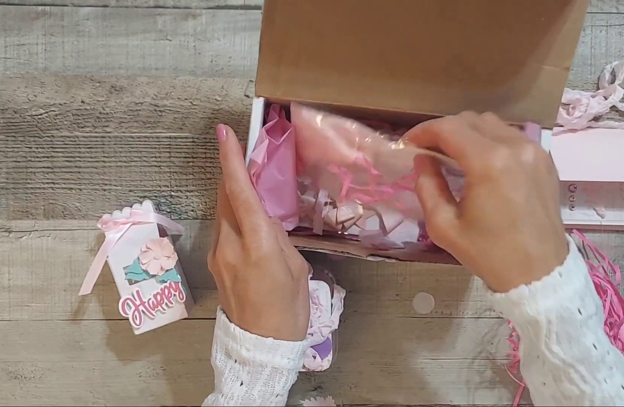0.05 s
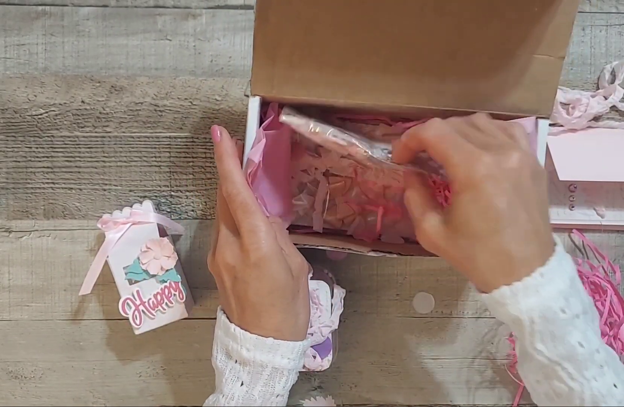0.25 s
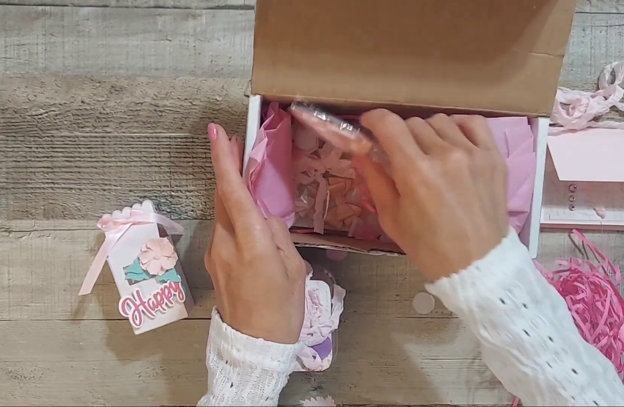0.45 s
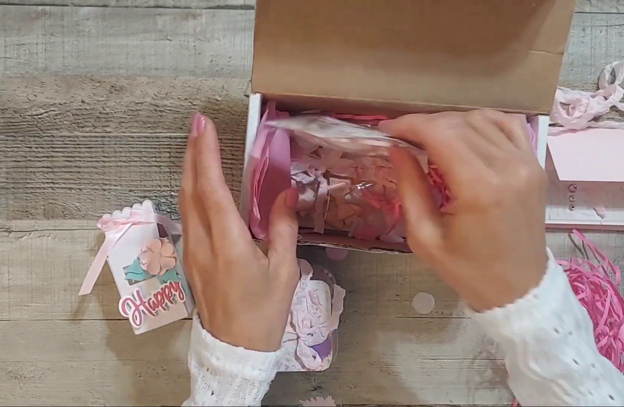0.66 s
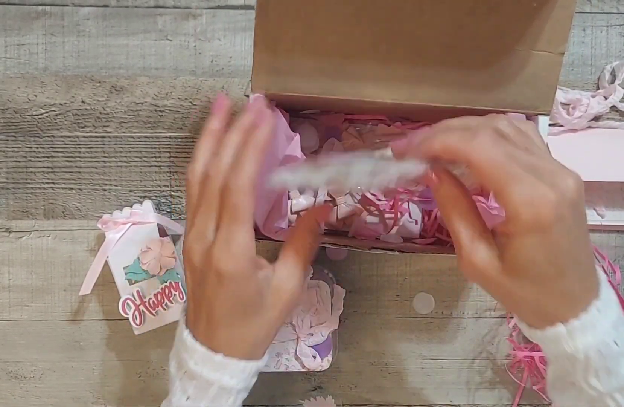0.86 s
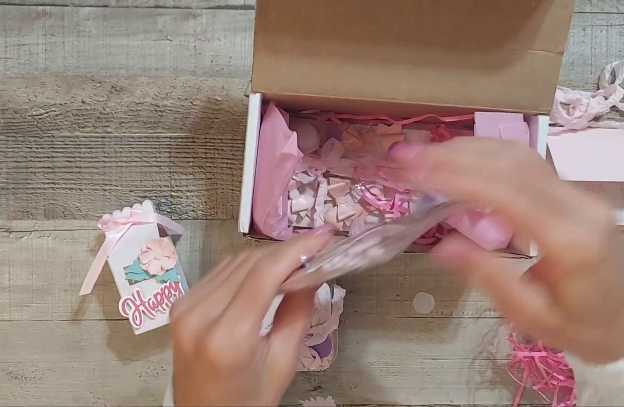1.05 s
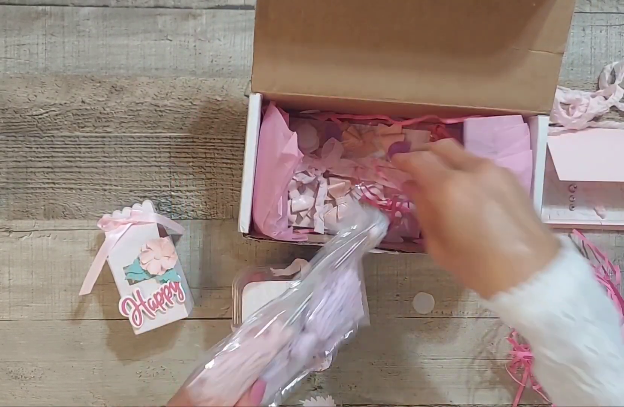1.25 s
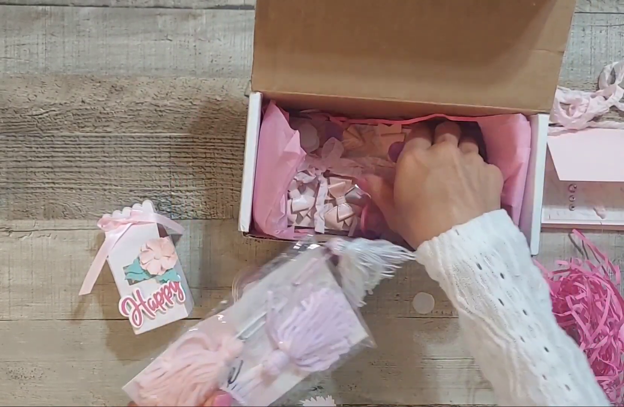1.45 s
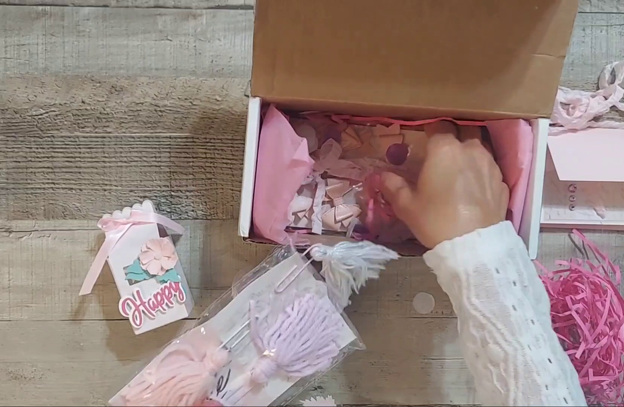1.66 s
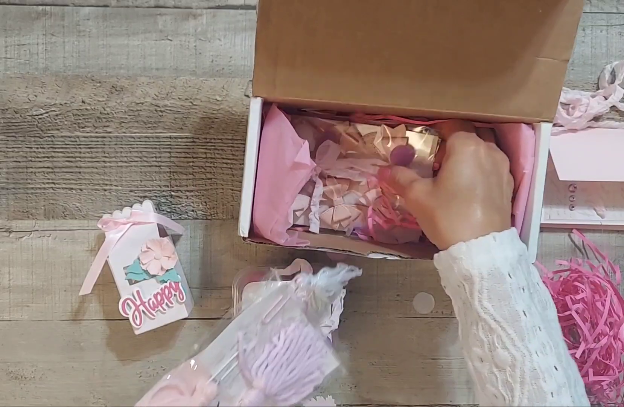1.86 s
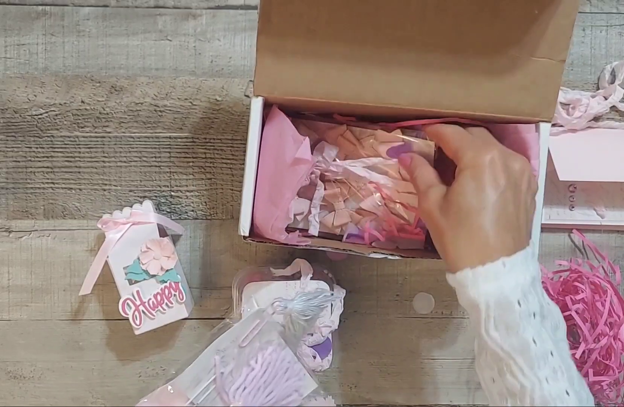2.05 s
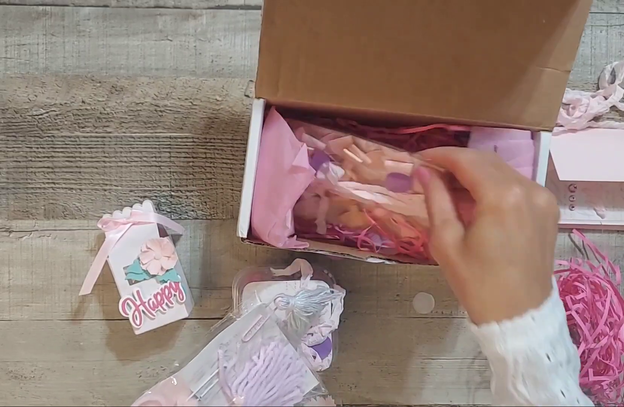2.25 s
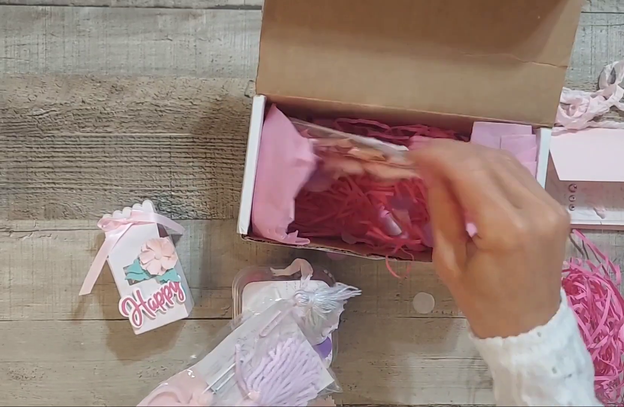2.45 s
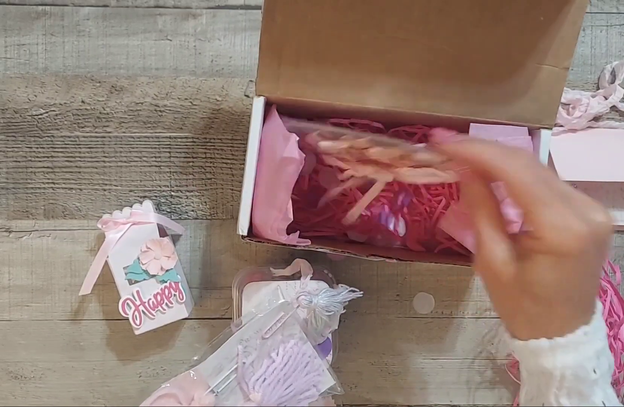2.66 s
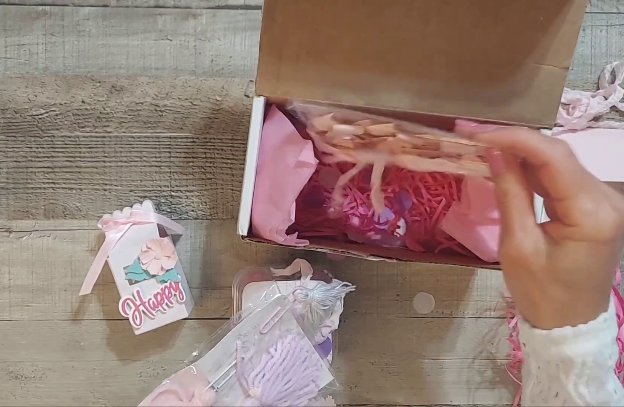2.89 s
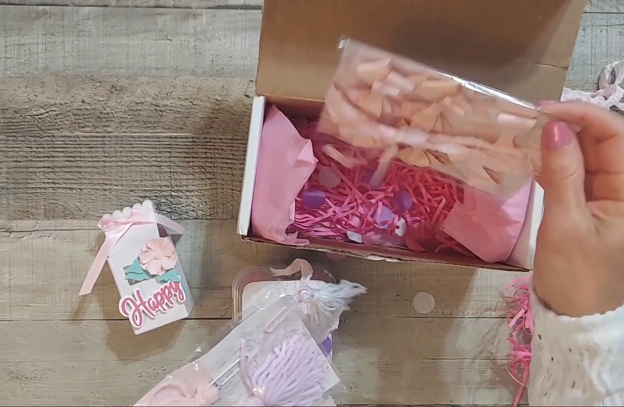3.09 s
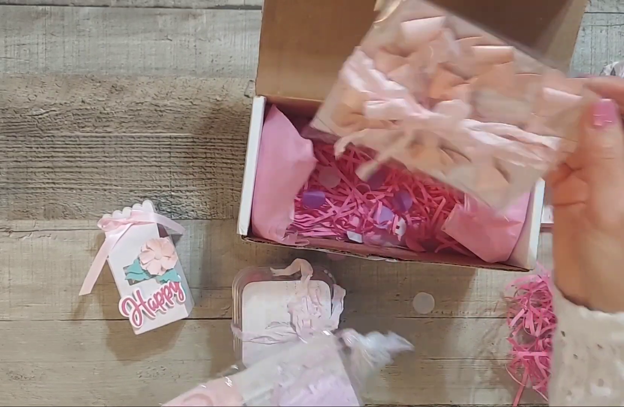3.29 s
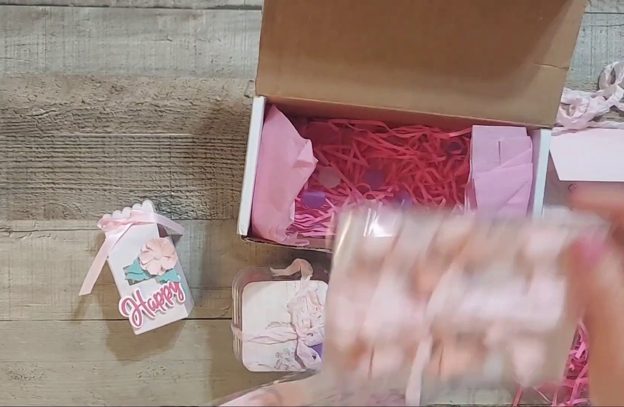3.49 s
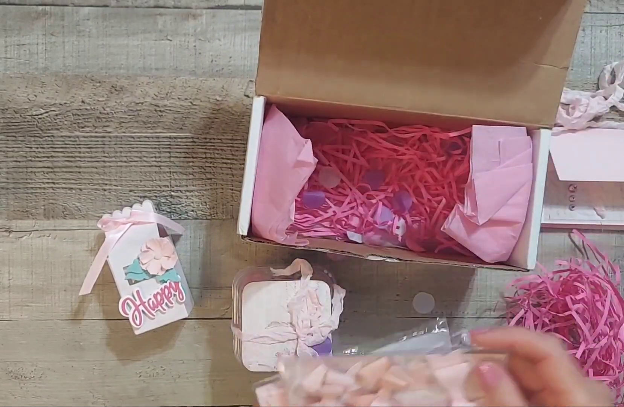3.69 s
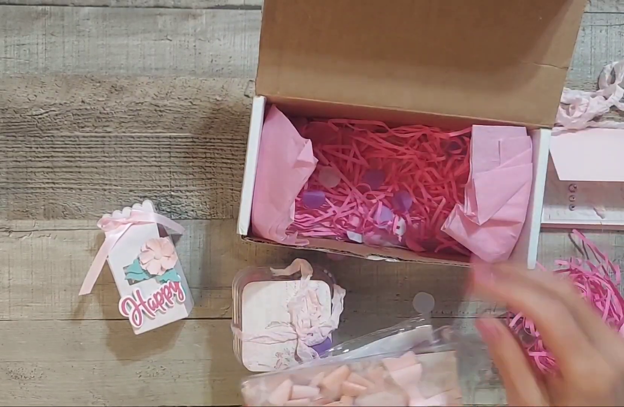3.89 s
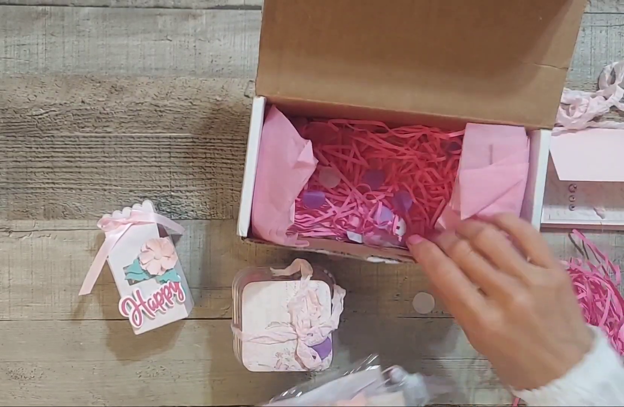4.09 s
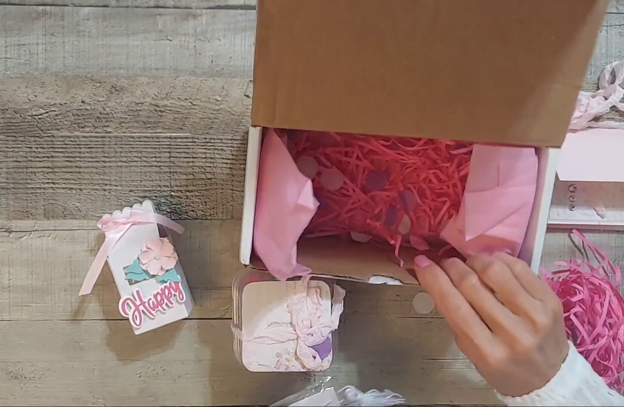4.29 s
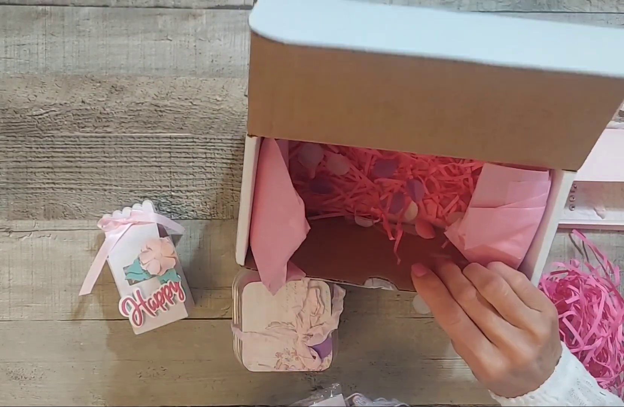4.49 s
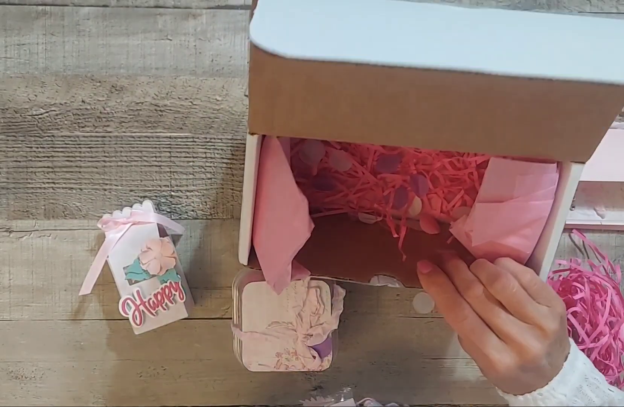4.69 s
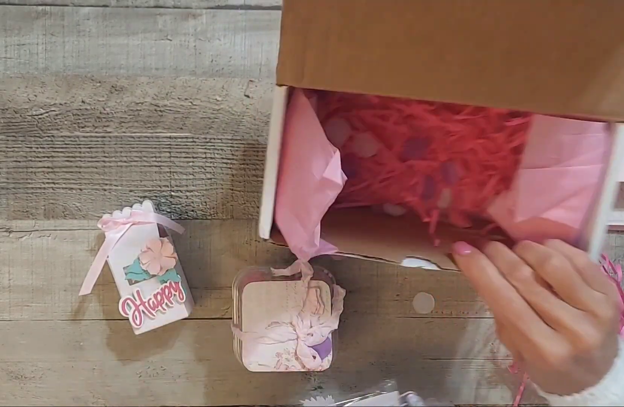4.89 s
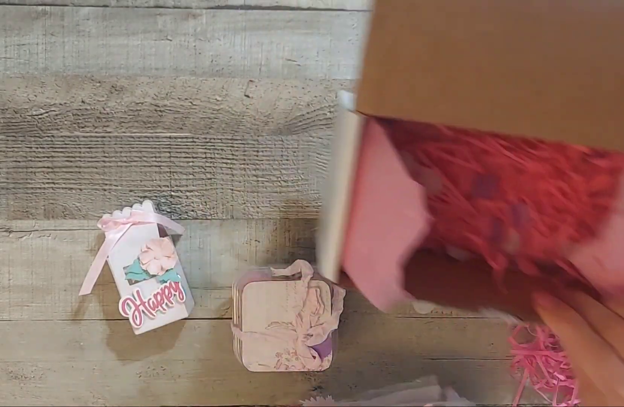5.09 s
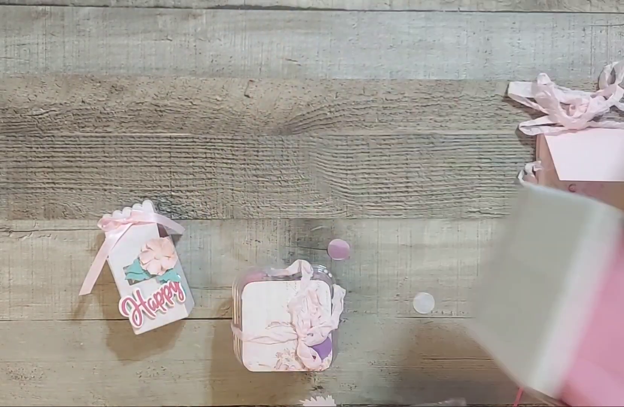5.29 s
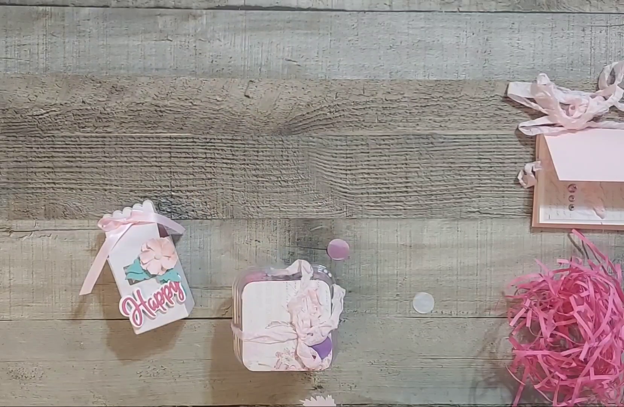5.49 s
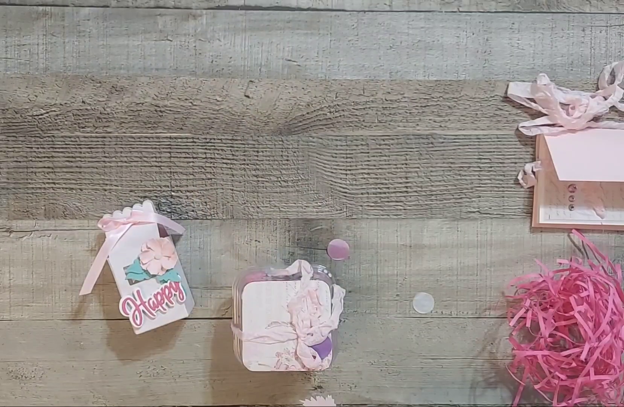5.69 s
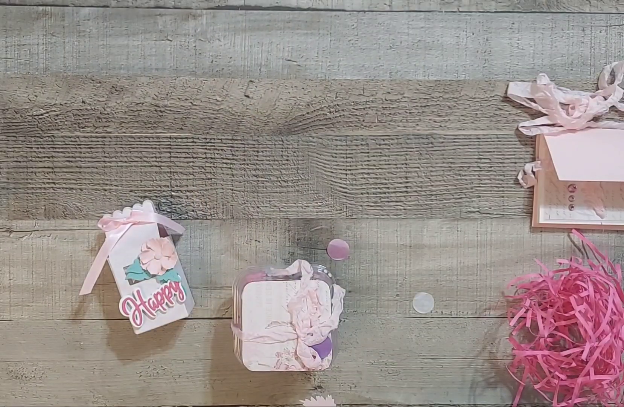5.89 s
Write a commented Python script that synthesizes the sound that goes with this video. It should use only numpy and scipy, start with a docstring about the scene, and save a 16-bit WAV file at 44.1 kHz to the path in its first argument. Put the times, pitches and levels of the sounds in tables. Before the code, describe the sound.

Hands pull two crinkly film packets from a box of dry paper strips: bright irregular snaps, dense rustle and low cardboard rubbing. A soft double knock comes at 1.5 seconds, the strongest crackles around 2 to 2.5 and 3.9. Light bumps and scrapes end in quiet, recorded close with a short room response.

```python
"""Cellophane packets lifted from a box

Hands lift two film packets out of a cardboard box lined with tissue and paper shred, then slide the box away.
Film: shaped noise snaps, random small cracks and clumped resonant slips. Shred and cardboard: lower slips.
Drags are narrow-band noise; knocks ring damped box modes. A small room answers as decaying stereo noise.
Coloured noise makes the still air, wavering sines the low hum."""
import sys
import numpy as np
from scipy import signal
from scipy.fft import rfft, irfft, next_fast_len
from scipy.io import wavfile

SR = 44100
rng = np.random.default_rng(int(sys.argv[2]) if len(sys.argv) > 2 else 0)


def to_wav(sig):
    """Store sig (one row per channel, or 1-D mono) as 16-bit WAV at the path in sys.argv[1].

    Samples outside -1..1 are clipped; the rate is SR.
    """
    pcm = np.clip(np.atleast_2d(sig), -1, 1) * 32767
    pcm = np.round(pcm).astype(np.int16)
    wavfile.write(sys.argv[1], SR, pcm.T)  # frames by channels


N = 262174
TIME_S = np.arange(N) / SR

# Spectrum of the still air. Each row: frequency in Hz, relative density in dB per Hz.
AIR_SPECTRUM = [(15, -41), (25, -31.5), (50, -13.5), (62, -6.5), (125, -5), (160, -9), (212, -10),
                (310, -15), (440, -20.5), (820, -25.5), (1260, -30.5), (2160, -31), (2800, -36),
                (6000, -41.5), (10000, -43), (13000, -39), (16000, -42.5)]
AIR_RMS_DB = -69.5
# Hum tones. Each row: frequency in Hz, rms level in dB before wavering and stereo lean.
HUM_TONES = [(69, -94), (98.5, -83), (154.4, -78)]

# Hand grips, pulls or sets down a packet. Each row: start in seconds, length in seconds,
# relative shred rustle in dB, film crinkle against that rustle in dB.
STROKES = [(-0.01, 0.1, -48, -3), (0.112, 0.063, -51.5, -3), (0.231, 0.12, -70.5, -2),
           (0.328, 0.069, -53.5, 0), (0.431, 0.02, -58, -4), (0.567, 0.032, -57.5, -7),
           (0.614, 0.1, -54, -5), (0.733, 0.043, -58, 1.5), (0.841, 0.018, -55, 1), (1.06, .03, -71.5, 4),
           (1.086, 0.057, -47.5, -5.5), (1.19, .055, -66, -2), (1.296, 0.079, -81, 4),
           (1.403, 0.046, -63, -5), (1.473, 0.08, -56, -5.5), (1.636, 0.074, -57.5, -10.5),
           (1.762, 0.15, -59, -9.5), (1.879, 0.082, -47, -3.5), (1.971, 0.061, -50, -6),
           (2.014, 0.072, -44.5, -1.5), (2.104, 0.18, -50, -11), (2.276, 0.089, -46.5, -1),
           (2.387, 0.056, -49, -4), (2.484, 0.24, -58.5, -2.5), (2.733, 0.029, -52.5, 1),
           (2.842, 0.1, -60.5, -10), (2.988, 0.037, -76.5, 8), (3.147, .07, -73, 4),
           (3.228, 0.042, -69.5, 10.5), (3.417, 0.021, -62, 2), (3.601, 0.054, -74.5, 4),
           (3.665, 0.018, -58.5, -3), (3.78, .06, -64.5, -0.5), (3.871, 0.08, -54.5, -0.5),
           (3.924, 0.035, -64, 1), (4.159, 0.13, -65.5, -1), (4.362, 0.05, -59.5, -5),
           (4.939, 0.036, -71, -6), (5.048, 0.16, -75.5, -2), (5.186, 0.024, -62, -7.5)]
ATTACK_S, RELEASE_DB_PER_S = .009, 379
# Held film and shred stir faintly between strokes, until the hand lets go.
STIR_SHRED_DB, STIR_FILM_DB, STIR_LENGTH_S = -80.5, -78, 4.3
# Contents pressing on the cardboard. Each row: time in seconds, rubbing against the rustle in dB.
CONTACT = [(0.0, -3.5), (0.7, -1), (0.8, -11.5), (1.12, -10), (1.42, -8), (1.7, -5), (2.05, -3), (2.2, 0),
           (2.35, -4.5), (2.55, 0.5), (2.7, -15), (4.0, -21.5)]
# Box pushed over the table. Each row: start in seconds, length in seconds, relative level in dB.
PUSHES = [(1.51, 0.09, -54), (4.18, .15, -62), (4.41, 0.086, -62), (5.06, 0.046, -76), (5.199, 0.013, -61),
          (5.69, 0.041, -77)]

# Spectra of the materials. Each row: frequency in Hz, relative density in dB per Hz.
SHRED_SPECTRUM = [(300, -24.5), (700, -13), (1250, -2), (1800, 1.5), (2500, 2), (3050, 6.5), (3800, -2.5),
                  (4600, 7.5), (6000, -11), (8000, -9.5), (10000, 0.5), (16000, -11)]
CRINKLE_SPECTRUM = [(1000, -33), (3000, -7.5), (6000, 3.5), (8000, 6.5), (9700, -6), (12500, 5),
                    (20000, -6.5)]
CARDBOARD_SPECTRUM = [(80, -10.5), (200, -12.5), (300, -12), (400, -9), (520, -11.5), (670, -1), (760, -6),
                      (880, -5), (1250, -8), (1800, -12.5), (3000, -25)]
FILM_SPECTRUM = [(150, -20.5), (450, -15.5), (900, -13), (1350, -3), (2100, 2.5), (3000, 1), (3900, -4.5),
                 (4800, -1), (6000, -8), (8000, -1.5), (9700, -5.5), (12500, 1.5), (20000, -19.5)]
MAX_SLIP_STEPS = 4.5   # largest slip, in mean steps
SLIDING_HISS_RMS = .3   # smooth sliding against the separate slips

# Film buckles. Each row: start in seconds, relative level in dB, pitch of the buckling facet in Hz,
# treble against the middle band in dB.
SNAPS = [(0.0097, -34, 5600, 1.5), (0.1181, -29, 2750, -7), (0.1431, -33.5, 4580, 6.5),
         (0.1474, -31, 2930, -5), (0.186, -37.5, 4540, 4), (0.2445, -42.5, 2830, 0), (0.3207, -42, 1480, 0),
         (0.3467, -39.5, 5900, 6.5), (0.44, -38.5, 5140, -0.5), (0.5787, -49, 3500, 8.5),
         (0.586, -39, 3240, -3), (0.6232, -31, 2440, 3.5), (0.7148, -43, 1850, -4), (0.7545, -37, 2320, -7),
         (0.8244, -40.5, 3070, 6), (0.858, -41, 3140, -11), (0.8637, -38, 1410, -2.5),
         (1.0924, -42.5, 1520, -1), (1.107, -29.5, 2730, -7), (1.1156, -31.5, 2400, 3.5),
         (1.131, -25.5, 2670, -14), (1.1447, -31.5, 2240, 4), (1.1771, -30, 4930, -7),
         (1.207, -38, 1510, -4), (1.2546, -41.5, 1460, -18), (1.2934, -41.5, 3080, -1.5),
         (1.3963, -41.5, 2670, 0.5), (1.422, -50.5, 2500, 10), (1.61, -44, 4260, -3.5),
         (1.731, -55.5, 2950, 8), (1.8123, -40, 5300, 5), (1.823, -40.5, 1890, 3.5), (1.8663, -38, 1270, 3),
         (1.904, -42, 1300, -6), (1.914, -38, 1260, -5), (1.9233, -28.5, 3050, -7),
         (1.938, -35.5, 4610, 3.5), (2.036, -32.5, 4020, -2), (2.06, -27.5, 3070, -3),
         (2.0808, -24, 2870, -14), (2.2139, -38, 4240, 4), (2.2192, -47, 1440, 9), (2.2525, -38, 1250, -1),
         (2.3653, -22.5, 3200, -17), (2.3956, -32.5, 3190, -9), (2.403, -30, 5930, -3),
         (2.4164, -25, 3000, -8), (2.458, -30, 3320, -1.5), (2.529, -48, 2200, -17),
         (2.7456, -34, 2340, -2.5), (2.805, -45, 3530, -11), (2.8544, -31, 3120, -4),
         (2.9422, -42.5, 1770, -4.5), (3.0569, -42, 2800, -13), (3.151, -56.5, 6400, 5.5),
         (3.188, -50.5, 6400, -1), (3.242, -48, 2880, -14), (3.309, -47.5, 2800, -3),
         (3.423, -42.5, 3730, -5), (3.492, -46, 4900, 9.5), (3.5863, -42, 2140, -0.5),
         (3.6738, -39.5, 2310, -0.5), (3.774, -50.5, 3730, 6.5), (3.8033, -47.5, 2080, -1),
         (3.8326, -42, 2900, -13), (3.8542, -42, 1760, 3.5), (3.864, -36, 2540, -1.5),
         (3.8929, -31, 3630, -0.5), (3.9019, -23.5, 2600, -5), (3.9052, -30, 2350, -4),
         (3.9104, -29, 1990, -6), (3.9442, -33.5, 4830, -4), (4.002, -42.5, 2600, 2.5),
         (4.036, -38, 2770, -20), (4.057, -31.5, 3020, -10), (4.0673, -40.5, 1720, 1.5),
         (4.19, -36.5, 2840, -12.5), (4.269, -61.5, 4630, 14.5), (4.3562, -44, 4060, -12),
         (4.3806, -30, 2600, -6.5), (4.806, -66.5, 2400, -14), (4.927, -37.5, 3060, -20.5),
         (5.0583, -56.5, 2000, -16), (5.1186, -51.5, 1600, -3), (5.1388, -53.5, 6090, 7),
         (5.1995, -31, 2870, -5.5), (5.2149, -30, 3100, -5.5), (5.2834, -37, 3140, -5.5)]
CRACK_DECAY_S = .00036
# A larger, lower facet moves more air: body against the middle band.
SNAP_BODY_DB, SNAP_BODY_DB_PER_OCTAVE = -6.5, -5.5
AVERAGE_FACET_HZ = 3000
FACET_RING_DB_PER_DB = 0.906   # a dull buckle rings its facet more: ring gained per treble lost

# Surface drags on one resonance. Each row: peak time in seconds, time from peak to 1/e amplitude in seconds,
# rms level at the peak in dB, pitch in Hz.
DRAGS = [(0.042, 0.085, -56, 785), (2.15, 0.024, -57.5, 1258), (2.277, 0.017, -51, 1510),
         (2.356, 0.0079, -41, 1246), (2.455, 0.0055, -45, 3100), (2.65, 0.012, -56, 3300),
         (2.88, 0.017, -55.5, 3100), (3.272, 0.03, -65.5, 2960), (4.193, 0.021, -61, 657),
         (4.497, 0.0094, -57, 631), (4.546, 0.01, -71, 707), (4.959, 0.022, -70.5, 3820)]
# Knocks on the box. Each row: start in seconds, relative level in dB, hardness of the contact as a cutoff in Hz.
BUMPS = [(1.516, -39, 2500), (1.5272, -42.5, 700), (1.535, -38.5, 342), (1.555, -53, 450),
         (0.144, -45.5, 900), (4.2274, -51.5, 1180), (4.237, -53, 101.7), (4.321, -48, 300),
         (4.3827, -48, 3500), (4.482, -60, 800)]
# Damped modes of the cardboard box. Each row: frequency in Hz, level in dB before random scatter, t60 in seconds.
BOX_MODES = [(127, -10, .07), (163, -12, .08), (232, -3.5, .08), (335, -9, .08), (398, -3, .07),
             (520, 0, .06), (602, .5, .07), (700, 4, .02), (776, -.5, .07), (1270, 4, .035),
             (1475, 4.5, .03), (2000, 8, .025)]

# Correlation of the two channels. Each row: frequency in Hz, correlation from -1 to 1.
NEAR_LIKENESS = [(100, .94), (1000, 0.98), (3000, 0.72), (5000, 0.11), (8000, 0.089), (12000, 0.04)]
ROOM_LIKENESS = [(25, 0.41), (100, 0.97), (500, 0.1), (1500, 0), (4000, 0.072), (12000, 0)]
# Room decay. Each row: frequency in Hz, t60 in seconds.
ROOM_T60 = [(200, 0.28), (1000, 0.24), (4000, 0.245), (8000, 0.22), (15000, 0.2)]
CUTOFF_HZ = 16100


def from_db(db):
    """Decibels to gain."""
    return 10 ** (np.asarray(db) / 20)


def rms_one(x):
    """Scale to an rms of 1."""
    return x / np.sqrt(np.mean(x ** 2) + 1e-20)


def unit_energy(x):
    """Scale each channel to an energy of 1."""
    return x / np.linalg.norm(x, axis=-1, keepdims=True)


def lean(x, db):
    """Raise left over right by db; a negative value favours the right."""
    return x * from_db(db * np.array([[.5], [-.5]]))


def at_hz(points, hz):
    """Interpolate a table on a log-frequency axis."""
    freq_hz, value = np.transpose(points)
    return np.interp(np.log(hz + 1), np.log(freq_hz), value)


def drift(rate_hz):
    """Slow chance: lines between normal draws of spread 1, rate_hz draws a second."""
    knots = rng.standard_normal(N // 20)
    return np.interp(TIME_S * rate_hz, np.arange(len(knots)), knots)


def convolve(x, response):
    """Filter by an impulse response, keeping the length."""
    return signal.fftconvolve(x, np.atleast_2d(response), axes=-1)[:, :x.shape[-1]]


def colour(x, spectrum, size=4096):
    """Causal minimum-phase filter of the given spectrum, power gain 1 for white noise."""
    gain = from_db(at_hz(spectrum, np.fft.rfftfreq(size, 1 / SR)))
    cepstrum = irfft(np.log(gain))
    # fold the cepstrum onto positive time: minimum phase
    cepstrum[1:size // 2] *= 2
    cepstrum[size // 2 + 1:] = 0
    response = irfft(np.exp(rfft(cepstrum)))
    return convolve(x, response / np.linalg.norm(response))


def stereo(pair, likeness):
    """Mix two unrelated signals into left and right with the given correlation at each frequency."""
    size = next_fast_len(pair.shape[-1])
    mid, side = rfft(pair, size)
    alike = np.clip(at_hz(likeness, np.fft.rfftfreq(size, 1 / SR)), -1, 1)
    shared = np.sqrt((1 + alike) / 2) * mid
    opposed = np.sqrt((1 - alike) / 2) * side * [[1], [-1]]
    return irfft(shared + opposed, size)[:, :pair.shape[-1]]


def cut(x, hz, kind, order=2):
    """Butterworth filter, edges kept in a safe range."""
    edges_hz = np.clip(hz, 10, .45 * SR)
    return signal.sosfilt(signal.butter(order, edges_hz, kind, fs=SR, output="sos"), x)


def resonate(x, hz, width_hz):
    """Two-pole resonance with a peak gain of 1."""
    r = np.exp(-np.pi * width_hz / SR)
    numerator = np.array([1, 0, -1]) * (1 - r * r) / 2
    denominator = [1, -2 * r * np.cos(2 * np.pi * hz / SR), r * r]
    return signal.lfilter(numerator, denominator, x)


def background(waver=0.37, hum_lean_db=-3):
    """Still air as coloured diffuse noise; hum as sines wavering in amplitude and phase."""
    noise = stereo(rng.standard_normal((2, N)), ROOM_LIKENESS)
    air = from_db(AIR_RMS_DB) * colour(noise, AIR_SPECTRUM, size=16384)
    hum = 0
    for hz, db in HUM_TONES:
        amplitude = from_db(db) * np.sqrt(2) * (1 + waver * drift(21))
        hum = hum + amplitude * np.sin(2 * np.pi * hz * TIME_S + drift(5))
    return air + lean(hum, hum_lean_db)


def stroke(start_s, length_s):
    """Amplitude of one movement: quick swell, hold, even decay in dB."""
    age_s = np.maximum(TIME_S - start_s, 0)
    swell = 1 - np.exp(-(age_s / ATTACK_S) ** 2)
    return swell * from_db(-RELEASE_DB_PER_S * np.maximum(age_s - length_s, 0))


def effort(movements):
    """Level in dB of overlapping movements (start s, length s, dB), summed in power."""
    power = sum((from_db(db) * stroke(start_s, length_s)) ** 2 for start_s, length_s, db in movements)
    return 10 * np.log10(power + 1e-12)


def hands():
    """Hand movements drive the levels in dB of cardboard rub, shred rustle and film crinkle."""
    shred_moves = [(start_s, length_s, db) for start_s, length_s, db, _ in STROKES]
    film_moves = [(start_s, length_s, db + film_db) for start_s, length_s, db, film_db in STROKES]
    shred_db = effort(shred_moves + [(0.014, STIR_LENGTH_S, STIR_SHRED_DB)])
    film_db = effort(film_moves + [(0.11, STIR_LENGTH_S, STIR_FILM_DB)])
    inside_db = shred_db + np.interp(TIME_S, *np.transpose(CONTACT))
    rub_db = 20 * np.log10(np.hypot(from_db(inside_db), from_db(effort(PUSHES))))
    return rub_db, shred_db, film_db


def creases(per_s, spread_db, low_hz, high_hz, cycles, hiss, clump_db, shift_db, count=16):
    """Tiny slips in clumps each ring one facet for a few cycles, over the hiss of sliding."""
    born = rng.random(N) < per_s * from_db(clump_db * drift(60)) / SR
    sizes = born * from_db(spread_db * np.minimum(rng.exponential(1, N), MAX_SLIP_STEPS))
    clicks = sizes * rng.choice([-1, 1], (2, N))
    facet = rng.integers(0, count, N)
    rings = 0
    for k, hz in enumerate(np.geomspace(low_hz, high_hz, count)):
        load = from_db(shift_db * drift(45))   # strain on each facet wanders
        struck = clicks * (facet == k) * load + 1e-18
        rings = rings + resonate(struck, hz, hz / cycles) / np.sqrt(hz)
    sliding = hiss * rng.standard_normal((2, N))
    return stereo(rms_one(rms_one(rings) + sliding), NEAR_LIKENESS)


def folds(shred_db, level_db=-6):
    """Stiff strips of shred kink with pitched ticks: sparse slips on longer-ringing facets."""
    ticks = creases(per_s=130, spread_db=2, low_hz=1100, high_hz=5200, cycles=7, hiss=0,
                    clump_db=3, shift_db=1.5)
    return lean(from_db(shred_db + level_db) * ticks, db=1.4)


def crackle(film_db, per_s=110, spread_db=2, level_db=-2):
    """Lesser film buckles: decaying noise bursts at random, as strong as the stroke that bends it."""
    born = rng.random(N) < per_s / SR
    clicks = born * from_db(spread_db * np.minimum(rng.exponential(1, N), MAX_SLIP_STEPS))
    bursts = signal.lfilter([1], [1, -np.exp(-1 / (CRACK_DECAY_S * SR))], clicks + 1e-18)
    noise = stereo(bursts * rng.standard_normal((2, N)), NEAR_LIKENESS)
    cracks = colour(noise, FILM_SPECTRUM)
    return lean(from_db(film_db + level_db) * rms_one(cracks), db=-5.0)


def snaps(flutter_s=0.015, flutter_db=-22, rebound_s=0.0015, rebound_db=-7, facet_db=1, facet_q=7,
          body_hz=1900, treble_hz=6200, level_db=15.0, lean_db=1.5, treble_s=0.0043, size=1024):
    """A buckle cracks, rings its facet, rebounds and flutters; returns near sound and mono room pulses."""
    out = np.zeros((3, N + size))
    t = np.arange(size) / SR
    rebound = from_db(rebound_db) * np.exp(-np.abs(t - rebound_s) / CRACK_DECAY_S)
    flutter = from_db(flutter_db) * np.exp(-t / flutter_s)
    shape = np.exp(-t / CRACK_DECAY_S) + rebound + flutter
    grains = rng.standard_normal((len(SNAPS), 2, size))
    for (start_s, db, hz, high_db), grain in zip(SNAPS, grains):
        near = stereo(grain, NEAR_LIKENESS) * shape
        ring_db = facet_db - FACET_RING_DB_PER_DB * high_db
        near = near + from_db(ring_db) * resonate(near, hz, hz / facet_q)
        # third channel: the plain pulse the whole sheet sends into the room
        crack = colour(np.vstack([near, t == 0]), FILM_SPECTRUM, size=512)
        # slack folds have more body, tight creases more treble, which dies first
        body = cut(crack, body_hz, "low", order=3)
        middle = cut(cut(crack, body_hz, "high", order=3), treble_hz, "low", order=4)
        treble = cut(crack, treble_hz, "high", order=4) * np.exp(-t / treble_s)
        body_db = SNAP_BODY_DB + SNAP_BODY_DB_PER_OCTAVE * np.log2(hz / AVERAGE_FACET_HZ)
        crack = unit_energy(middle) + from_db(body_db) * unit_energy(body)
        crack = crack + from_db(high_db) * unit_energy(treble)
        at = max(int(start_s * SR), 0)
        out[:, at:at + size] += from_db(db + level_db) * crack
    return lean(out[:2, :N], lean_db), out[2, :N]


def drags(q=9):
    """Noise, for irregular stick and slip, feeds one narrow resonance that swells and fades."""
    out = np.zeros(N)
    for peak_s, fade_s, db, hz in DRAGS:
        chatter = resonate(resonate(rng.standard_normal(N), hz, hz / q), hz, 2 * hz / q)
        out += from_db(db) * rms_one(chatter) * np.exp(-((TIME_S - peak_s) / fade_s) ** 2)
    return out


def bumps(contact_s=0.00069, level_db=-9, size=8192):
    """A knock rings the box modes; a soft contact reaches only the low ones."""
    out = np.zeros((2, N + size))
    t = np.arange(size) / SR
    hz, mode_db, t60_s = np.transpose(BOX_MODES)[:, :, None]
    chances = rng.standard_normal((len(BUMPS), 2, len(BOX_MODES), 1))
    for (start_s, db, hard_hz), (sign, scatter_db) in zip(BUMPS, chances):
        decay = from_db(mode_db + scatter_db - 60 * t / t60_s)
        modes = np.sign(sign) * decay * np.sin(2 * np.pi * hz * t)
        tap = rng.standard_normal(size) * np.exp(-t / contact_s)
        knock = cut(modes.sum(axis=0) + tap, 87, "high")   # a small box radiates little bass
        knock = cut(knock, hard_hz, "low")
        at = int(start_s * SR)
        out[:, at:at + size] += from_db(db + level_db) * rms_one(knock) / 2
    return out[:, :N]


def room(source, first_s=0.0012, size=22050):
    """Diffuse reflections of a mono sound: noise bands decaying by their t60, power gain 1."""
    t = np.arange(size) / SR
    edges_hz = np.geomspace(60, 21000, 9)
    tail = 0
    for low_hz, high_hz in zip(edges_hz, edges_hz[1:]):
        band = cut(rng.standard_normal((2, size)), [low_hz, high_hz], "band")
        t60_s = at_hz(ROOM_T60, np.sqrt(low_hz * high_hz))
        tail = tail + band * from_db(-60 * t / t60_s)
    response = unit_energy(stereo(tail, ROOM_LIKENESS) * (t > first_s))
    return convolve(np.tile(source, (2, 1)), response)


def scene():
    """Film, shred and box close by, plus their reflections, air and hum."""
    rub_db, shred_db, film_db = hands()
    rub = creases(per_s=1800, spread_db=1.5, low_hz=222, high_hz=1720, cycles=2.0, hiss=1.0,
                  clump_db=2.5, shift_db=3.5)
    shred = creases(per_s=1400, spread_db=3, low_hz=924, high_hz=8700, cycles=4.7, hiss=SLIDING_HISS_RMS,
                    clump_db=3.5, shift_db=3.0)
    film = creases(per_s=1900, spread_db=0.5, low_hz=2770, high_hz=16500, cycles=3.6, hiss=SLIDING_HISS_RMS,
                   clump_db=6, shift_db=-3.0)
    rub = from_db(rub_db - 2) * rms_one(colour(rub, CARDBOARD_SPECTRUM))
    shred = lean(from_db(shred_db - 2) * rms_one(colour(shred, SHRED_SPECTRUM)), db=-1.5)
    film = lean(from_db(film_db + 1.0) * rms_one(colour(film, CRINKLE_SPECTRUM)), db=7.0)
    rustle = shred + folds(shred_db) + film + crackle(film_db) + drags()
    cracks, pulses = snaps()
    box = lean(rub + bumps(), db=1.9)
    sent = from_db(-6.0) * pulses + from_db(-4.5) * rustle.mean(axis=0) + from_db(-7.5) * box.mean(axis=0)
    return cracks + rustle + box + room(sent) + background()


def record(dry):
    """Steep elliptic low-pass at the top of the band."""
    return signal.sosfilt(signal.ellip(10, .1, 80, CUTOFF_HZ, fs=SR, output="sos"), dry)


dry = scene()
out = record(dry)
to_wav(out)
```